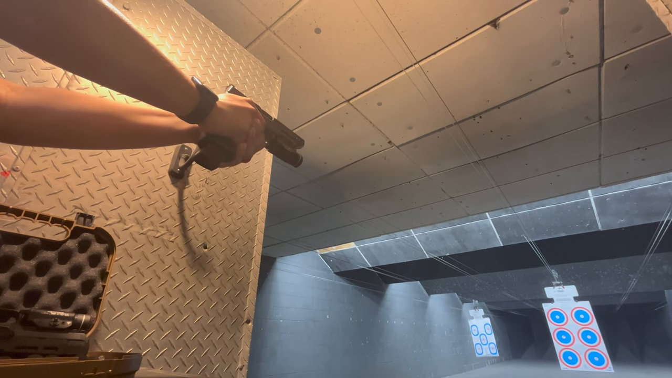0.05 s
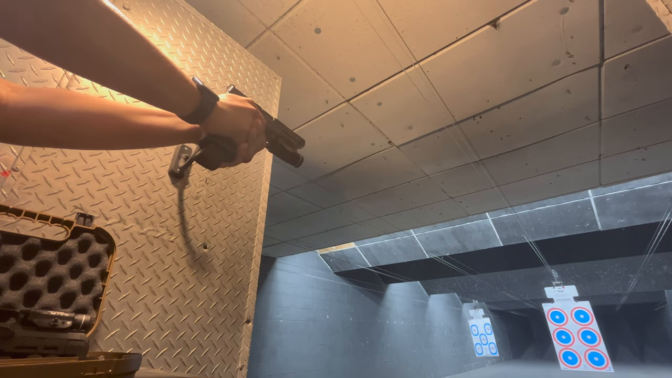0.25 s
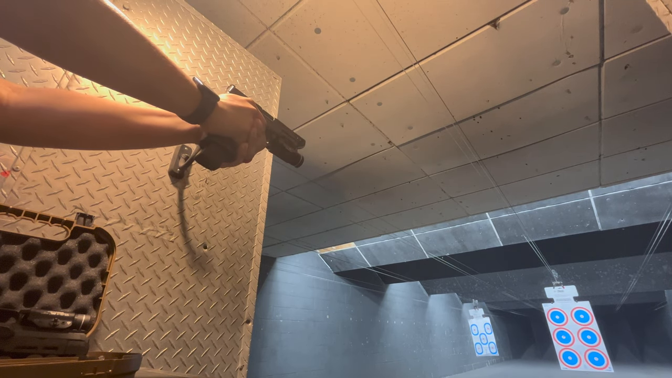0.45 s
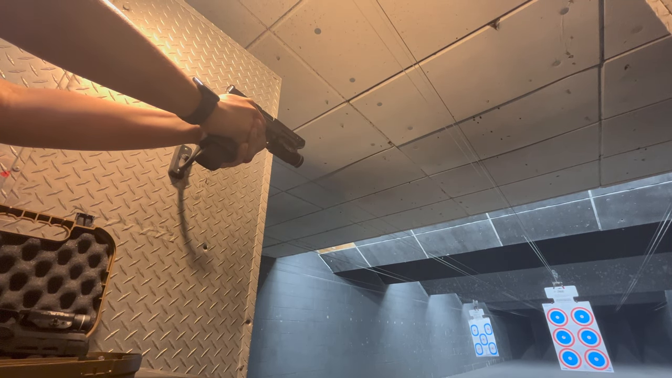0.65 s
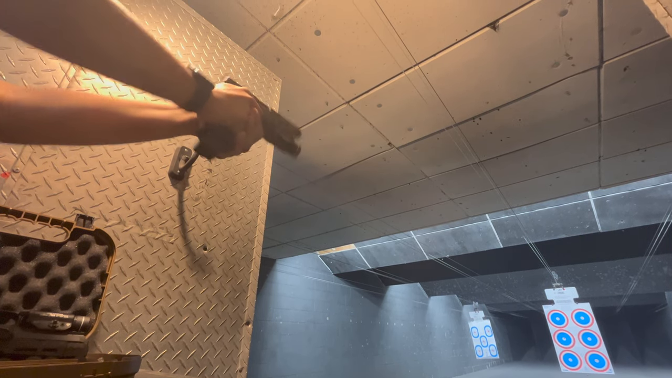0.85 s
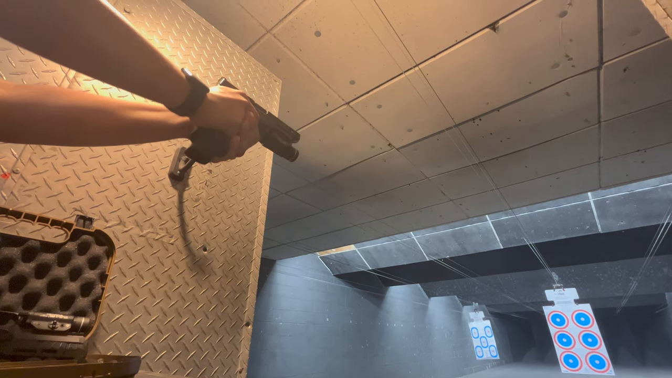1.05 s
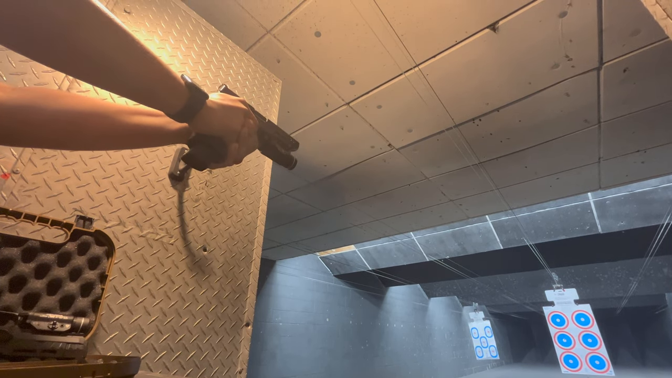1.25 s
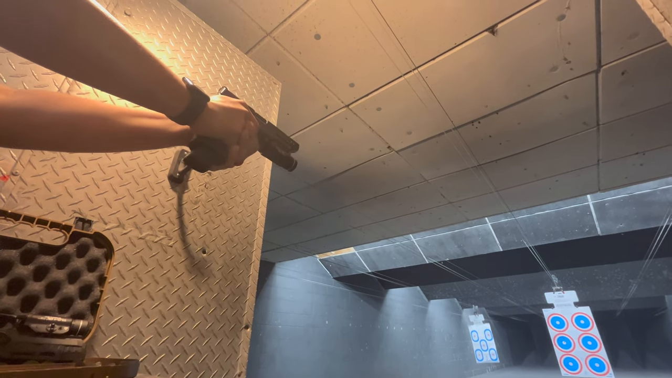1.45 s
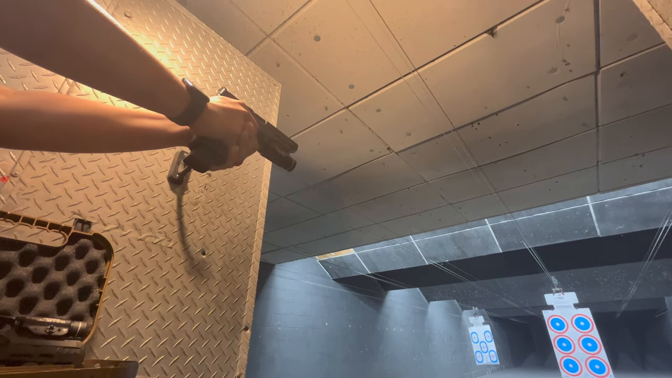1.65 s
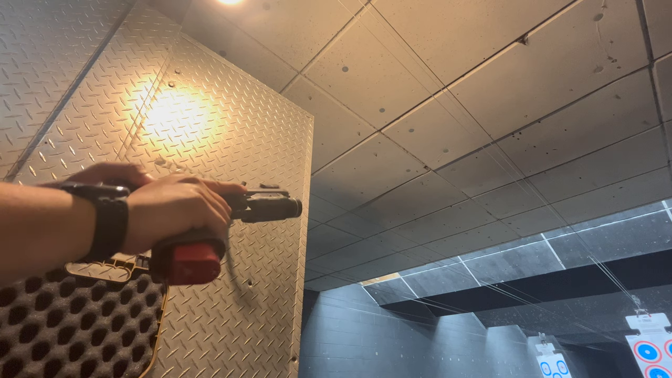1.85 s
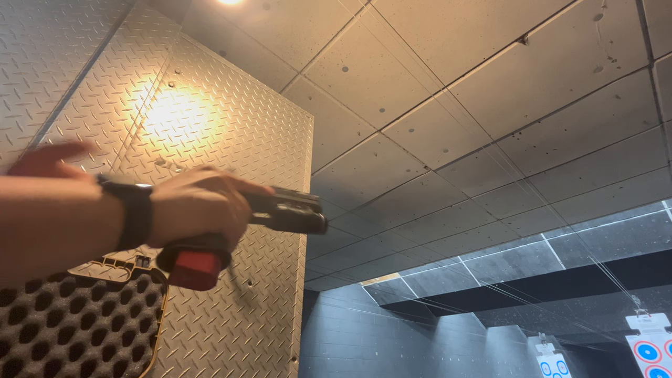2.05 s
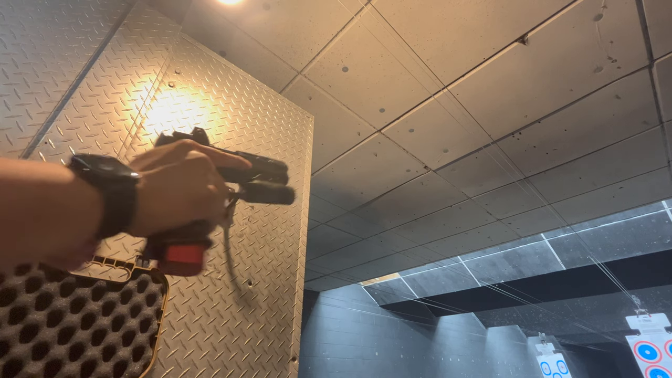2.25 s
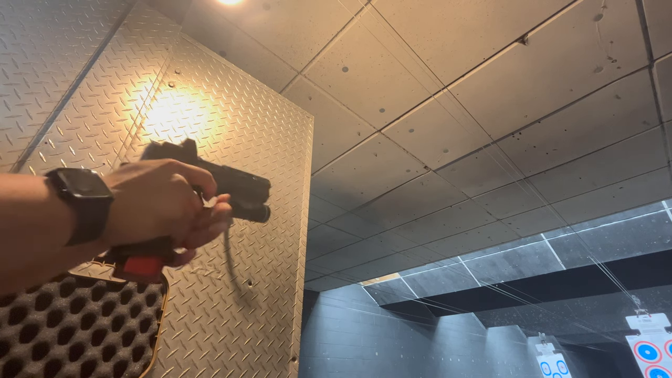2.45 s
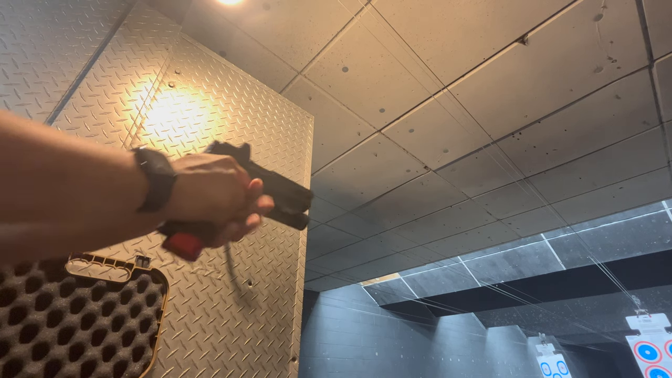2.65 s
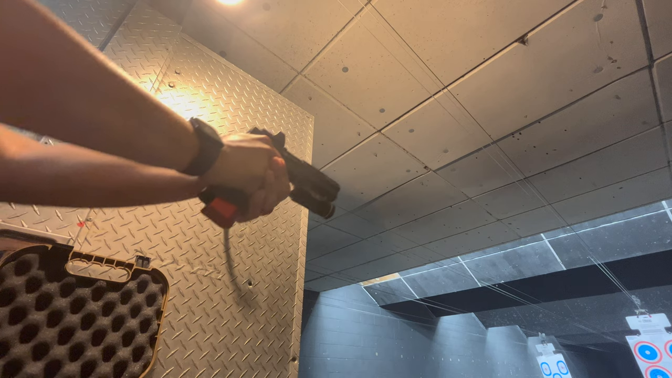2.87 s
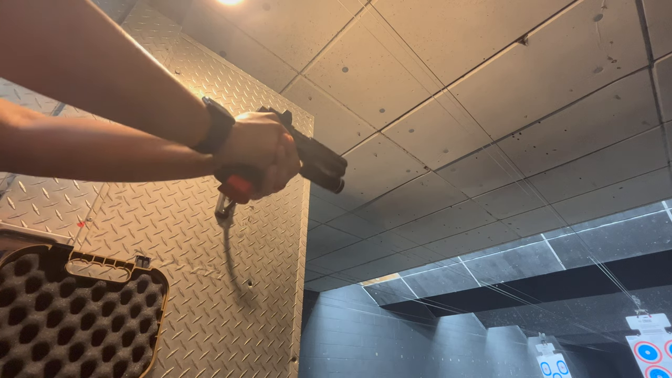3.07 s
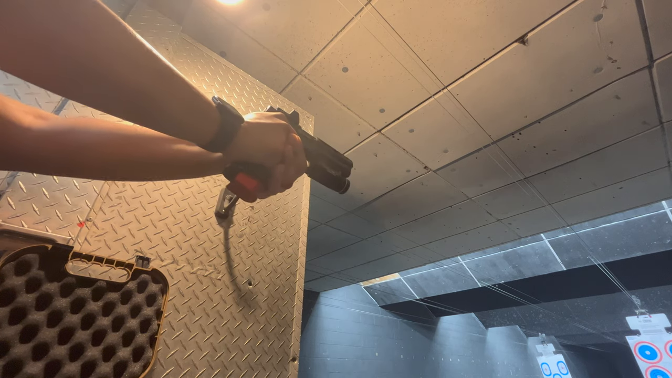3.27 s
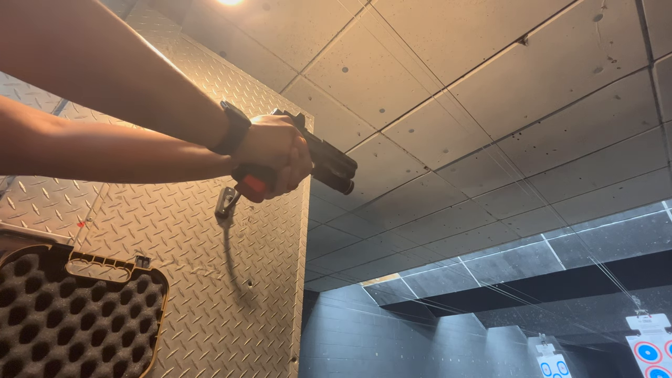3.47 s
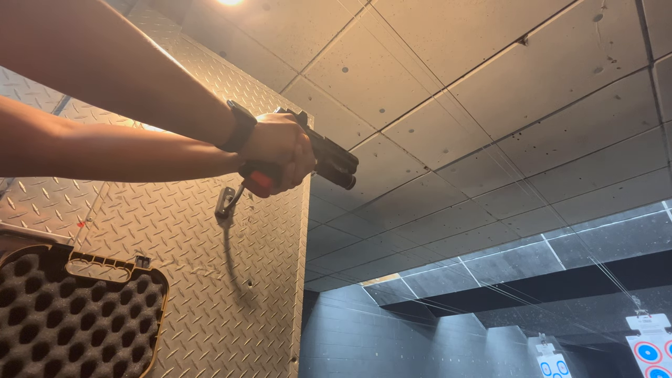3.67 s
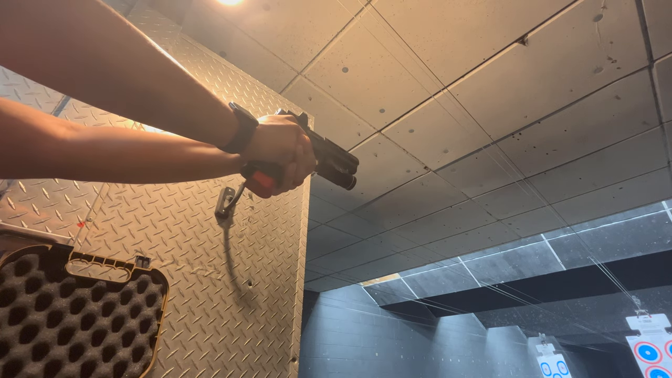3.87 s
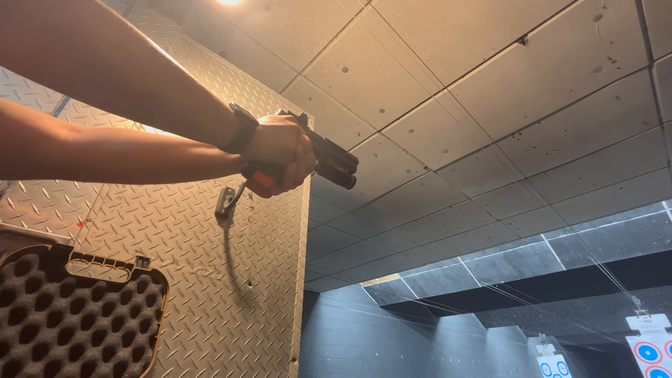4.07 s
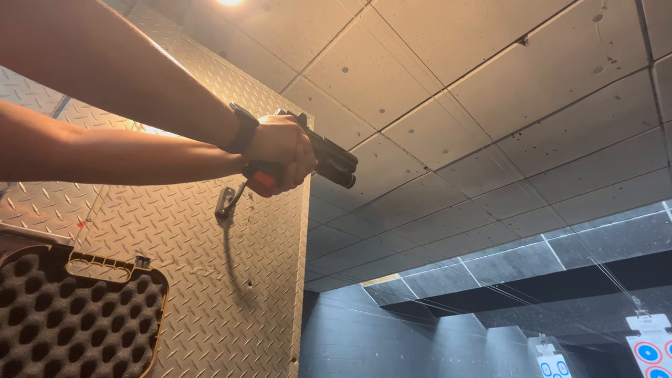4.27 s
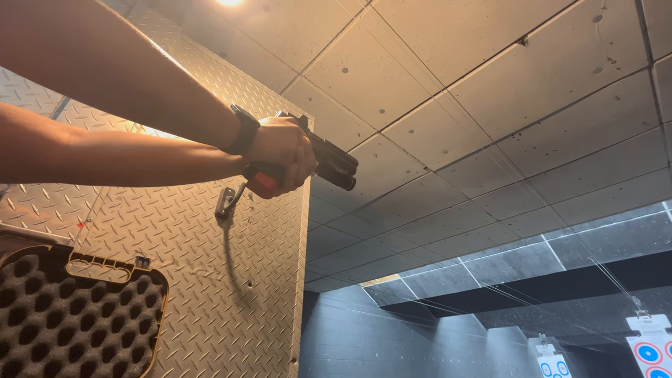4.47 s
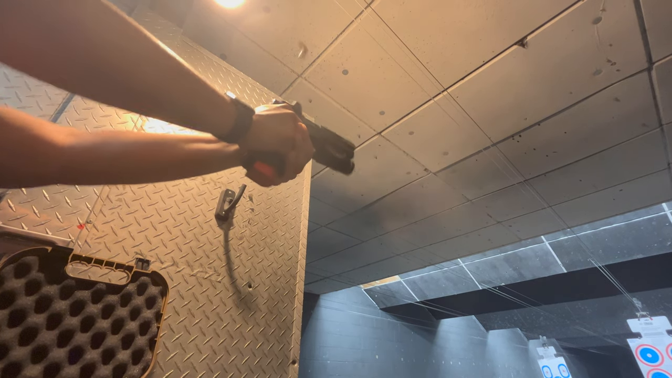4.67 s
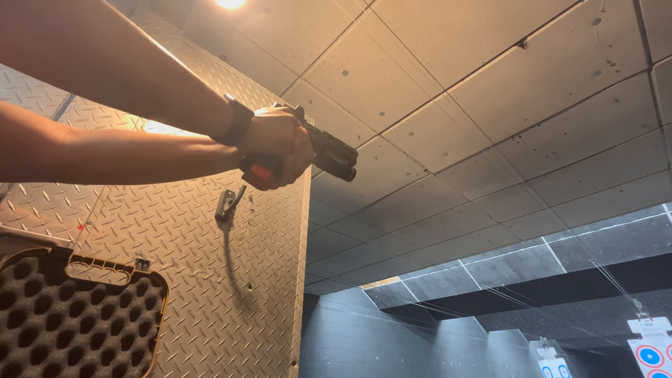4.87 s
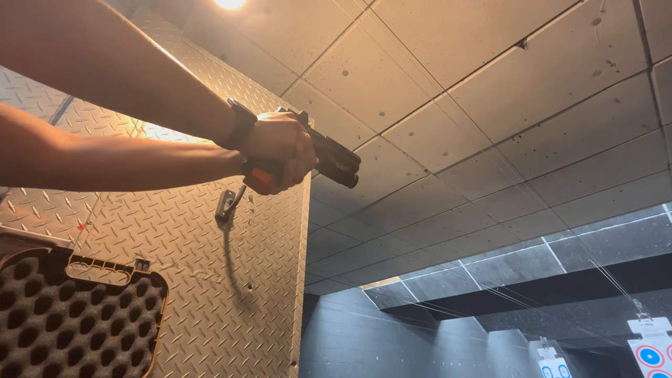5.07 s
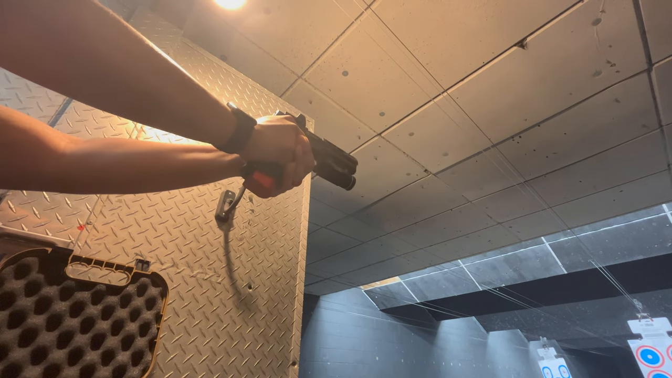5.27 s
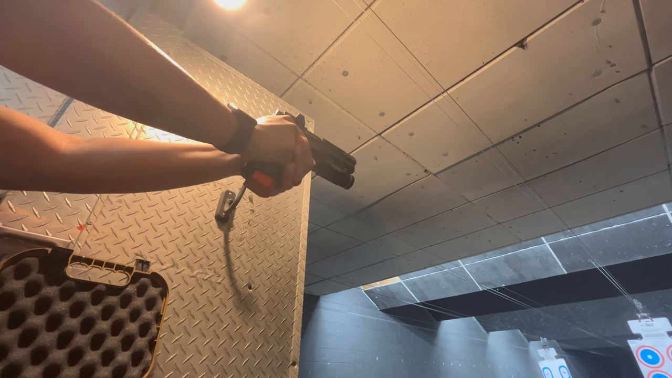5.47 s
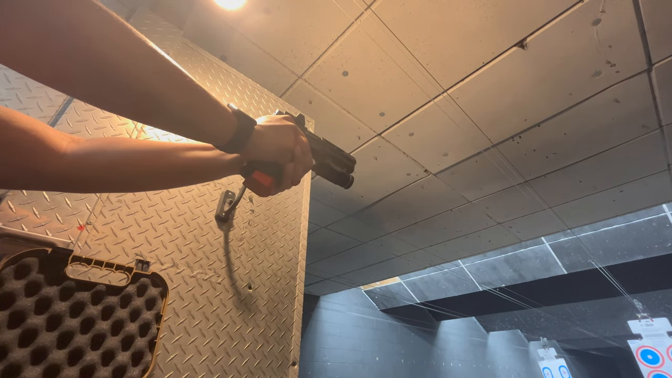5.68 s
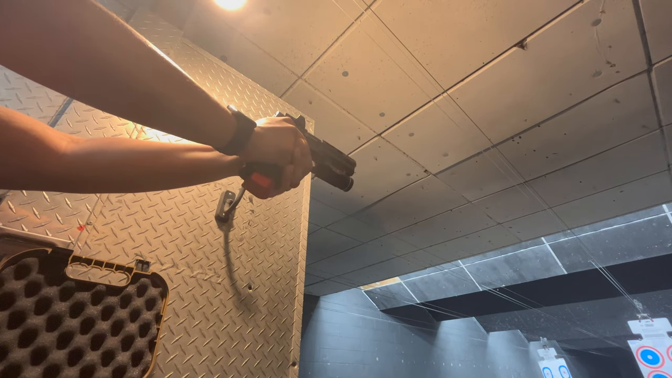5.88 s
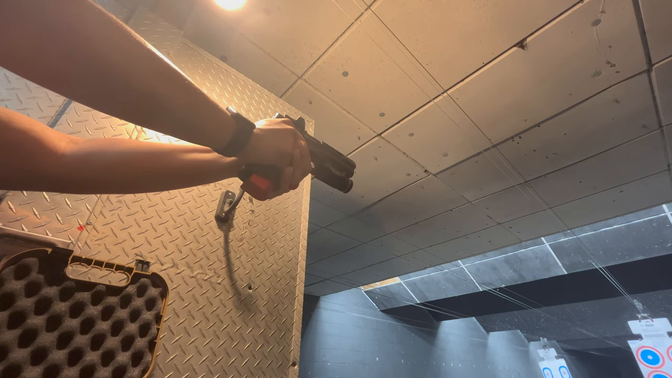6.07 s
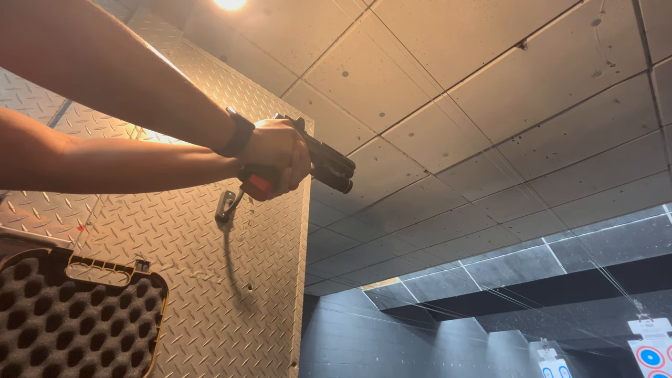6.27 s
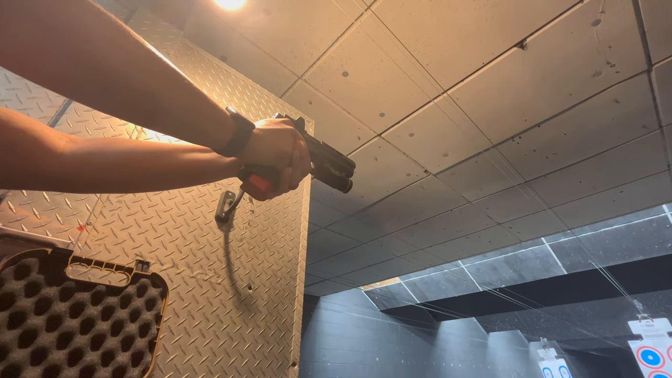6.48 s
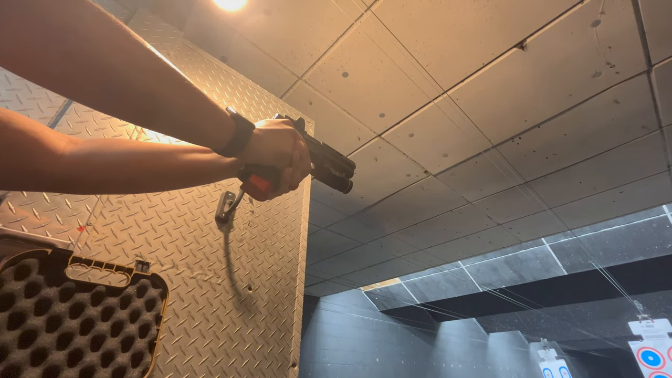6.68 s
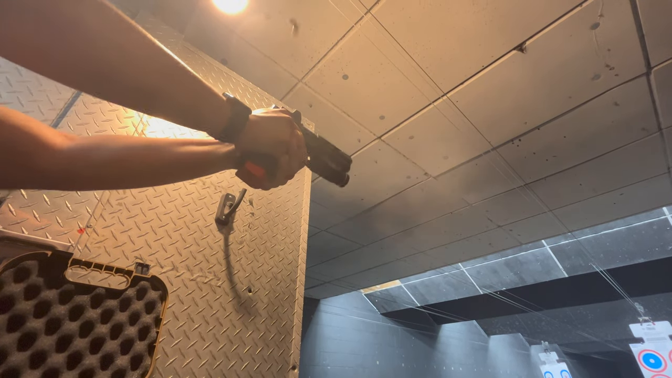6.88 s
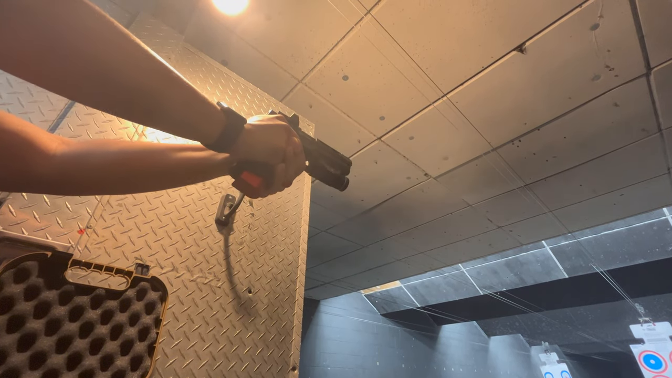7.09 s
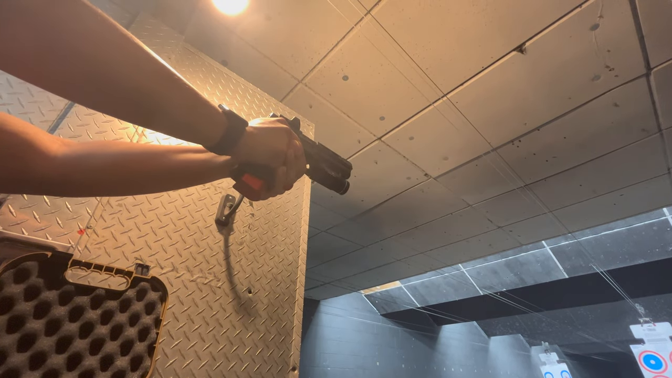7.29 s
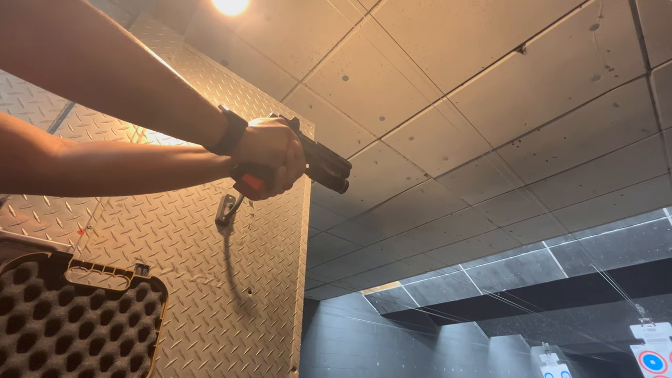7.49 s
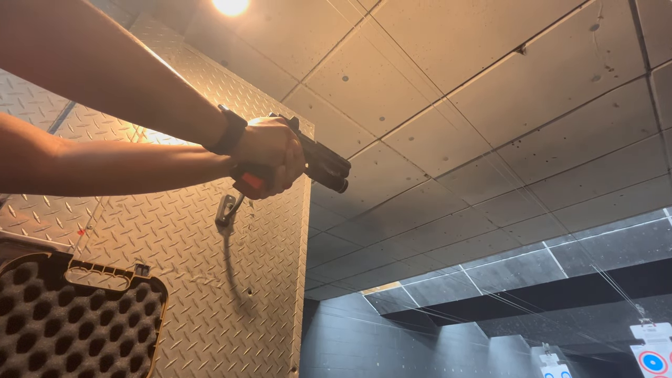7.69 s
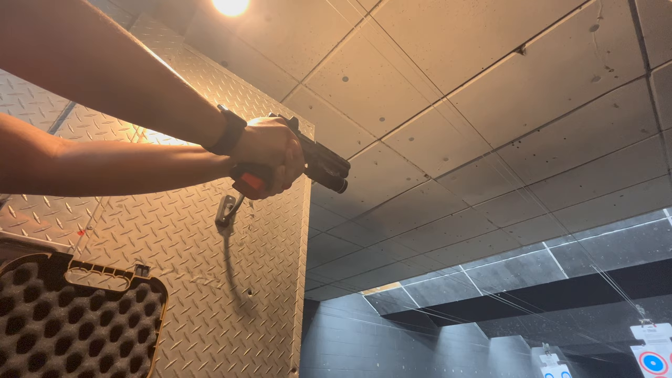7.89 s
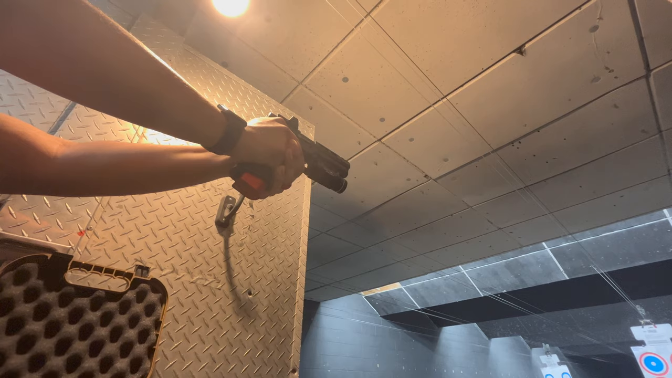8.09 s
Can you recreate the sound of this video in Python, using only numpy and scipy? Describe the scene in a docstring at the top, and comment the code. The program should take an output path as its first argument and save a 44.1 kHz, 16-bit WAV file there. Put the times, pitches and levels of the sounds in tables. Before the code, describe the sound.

One handgun shot, a brisk slide rack over rushing ventilation, then a faster run of near and neighbouring-lane shots ringing through a concrete hall.

```python
"""Handgun fire in a long concrete indoor range, heard from the bench. Order in time:
faint 1 kHz hall wash and faint ventilation noise (band noise, duct resonances, fan lines); brass cases (tick + tube
ring); near shots (the booth fills at once, the far end answers after about 0.14 s, the hall dies away); at 1.7 s the
slide is racked (clicks into frame resonances), and from there to 4.5 s the air noise is heard loud, with a brief dip
after the slide noises; then near shots mixed with shots from another lane, with more cases landing."""
import sys
import numpy as np
from scipy import signal
from scipy.io import wavfile

SR = 44100
rng = np.random.default_rng(int(sys.argv[2]) if len(sys.argv) > 2 else 0)


def unload_wav(signal):
    """Save mono or channel-first audio to the path in sys.argv[1] as 16-bit WAV at rate SR, clipped to [-1, 1]."""
    wavfile.write(
        sys.argv[1],
        SR,
        np.round(np.clip(np.atleast_2d(signal).T, -1, 1) * 32767).astype(np.int16),
    )


N = 358974


def amp(db):
    """dB to gain."""
    return 10 ** (np.asarray(db) / 20)


def rms_one(x):
    """Scale to rms 1."""
    return x / np.sqrt(np.mean(x ** 2) + 1e-20)


def at_hz(points, hz):
    """Read a table on a log-frequency axis."""
    table_hz, values = np.array(points).T
    return np.interp(np.log(hz), np.log(table_hz), values)


def in_time(rows, t):
    """Read a curve at times t."""
    return np.interp(t, *np.transpose(rows))


def add(out, sound, start_s):
    """Mix a sound in at start_s, cut at the end of out or at N."""
    i = round(start_s * SR)
    out[:, i:i + sound.shape[-1]] += sound[..., :N - i]


def resonance(x, hz, width_hz):
    """Two-pole peak with gain 1 on top."""
    r = np.exp(-np.pi * width_hz / SR)
    b = [(1 - r * r) / 2, 0, (r * r - 1) / 2]
    a = [1, -2 * r * np.cos(2 * np.pi * hz / SR), r * r]
    return signal.lfilter(b, a, x)


def steep_resonance(x, hz, width_hz):
    """Same peak twice in series: steeper skirts."""
    return resonance(resonance(x, hz, width_hz), hz, width_hz)


def drift(size, rate_hz):
    """Slow chance of spread 1, drawn at every 50th sample."""
    r = np.exp(-100 * np.pi * rate_hz / SR)
    slow = signal.lfilter([1], [1, -2 * r, r * r], rng.standard_normal(size // 50 + 402))[400:]
    return np.interp(np.arange(size) / 50, np.arange(len(slow)), rms_one(slow))


def ports(size):
    """White noise that is mostly shared by the two microphone ports."""
    mid, side = rng.standard_normal((2, size))
    return mid + .3 * side * [[1], [-1]]


BAND_EDGES_HZ = 22 * 2 ** np.arange(0, 9.7, .4)


def bands(size, likeness, balance):
    """Stereo noise band by band, with the likeness and balance of the two microphone ports."""
    white = rng.standard_normal((2, 2, size + 4000))
    for k, (low_hz, high_hz) in enumerate(zip(BAND_EDGES_HZ, BAND_EDGES_HZ[1:])):
        sos = signal.butter(2, [low_hz, high_hz], "band", fs=SR, output="sos")
        mid, side = signal.sosfilt(sos, white[k % 2])[:, 4000:]   # filter run-in dropped
        hz = np.sqrt(low_hz * high_hz)
        alike = np.clip(at_hz(likeness, hz), -1, 1)
        lean_db = at_hz(balance, hz) / 2
        pair = np.sqrt(1 + alike) * mid + np.sqrt(1 - alike) * side * [[1], [-1]]
        yield hz, pair * amp([[lean_db], [-lean_db]])


# Air noise between the ports: f/Hz, left-right likeness
AIR_LIKENESS = [(60, 1), (130, 0.99), (290, 0.34), (640, -0.86), (1410, -0.19), (3100, 0.16), (6820, 0.17),
                (15000, -0.49)]
# Air noise balance: f/Hz, L-R/dB
AIR_BALANCE = [(60, -1), (110, 1.5), (200, -2), (380, -1.5), (700, 5), (1290, 5.5), (2380, 2), (4400, 14.5),
               (8120, 2.5), (15000, -2.5)]


def steady(colour, level_db, tones, size):
    """Smooth air noise, with resonances standing out of it."""
    air = bands(size, AIR_LIKENESS, AIR_BALANCE)
    out = rms_one(sum(amp(at_hz(colour, hz)) * noise for hz, noise in air))
    for hz, width_hz, db in tones:
        out = out + amp(db) * rms_one(steep_resonance(ports(size), hz, width_hz))
    out = np.tile(out, N // size + 1)[:, :N]   # recurs only where it is faint
    return out * amp(level_db)


# Hall wash level: t/s, level/dB
WASH_LEVEL = [(0, -64.5), (.15, -68), (.73, -70), (1.7, -85), (1.72, -120)]
# Hall wash spectrum: f/Hz, density/(dB per Hz)
WASH_COLOUR = [(180, -15.5), (300, -8), (757, -5), (1130, 6.5), (1240, -6), (6370, -33), (10100, -28.5),
               (10900, -28), (12000, -34.5), (15600, -74.5), (22000, -120)]


def hall_wash():
    """Faint noise of the hall around 1 kHz, at the start only."""
    t = np.arange(N) / SR
    return steady(WASH_COLOUR, in_time(WASH_LEVEL, t), [], size=2 * SR)


# Air noise level over its loud stretch, dipping briefly after the slide noises: t/s, level/dB
LOUD_AIR = [(1.716, -37.5), (1.93, -38), (2.03, -47), (2.12, -38.5), (2.17, -34), (4.537, -32)]
QUIET_START_DB, QUIET_AFTER_DB, CREEP_DB_PER_S = -77.5, -90, 8.4   # before and after: faint, creeping up


def air_db(t):
    """Level at which the air noise is heard: faint, loud, faint."""
    on_s, off_s = LOUD_AIR[0][0], LOUD_AIR[-1][0]
    before_db = QUIET_START_DB + CREEP_DB_PER_S * t
    after_db = QUIET_AFTER_DB + CREEP_DB_PER_S * (t - off_s)
    quiet_db = np.where(t < on_s, before_db, after_db)
    return np.where((t >= on_s) & (t < off_s), in_time(LOUD_AIR, t), quiet_db)


# Ventilation spectrum: f/Hz, density/(dB per Hz)
AIR_COLOUR = [(12, -39), (20, -12.5), (60, -1.5), (142, -13), (204, -1), (248, -14.5), (310, -8.5),
              (590, -8), (1370, -12.5), (2390, -20.5), (2820, -25.5), (5850, -37), (10800, -53),
              (13500, -56), (16000, -85.5)]
# Duct resonances: f/Hz, width/Hz, level/(dB re air)
DUCT_TONES = [(48.3, 6, -12), (76.6, 17, -11.5), (122, 5.4, -17), (156.4, 6.6, -21.5), (200.2, 9, -15.5),
              (1360, 150, -19), (320.3, 17, -18)]


def ventilation():
    """Air noise of the ventilation with its duct resonances, at the heard air level."""
    t = np.arange(N) / SR
    return steady(AIR_COLOUR, air_db(t), DUCT_TONES, size=23 * SR // 5)


# Fan and motor lines: f/Hz, level/(dB re air)
FAN_LINES = [(119, -13.5), (159, -25.5), (199.2, -8.5)]


def fan_hum():
    """Fan and motor lines that waver in level and phase and follow the heard air level."""
    t = np.arange(N) / SR
    hum = 0
    for hz, db in FAN_LINES:
        level = amp(db + 2 * drift(N, 8))
        hum = hum + level * np.sin(2 * np.pi * (hz * t + 0.15 * drift(N, 3.2)))
    return hum * amp(air_db(t))


# Brass cases landing: t/s, tick level/dB, tick f/Hz, tick width/Hz, ring f/Hz, ring level/dB
CASES = [(.0444, -57, 5200, 1500, 10700, -110), (.5433, -64, 6000, 9000, 10900, -110),
         (1.1377, -23, 10100, 7000, 10200, -56), (1.3712, -18, 4000, 16000, 10150, -61),
         (5.0035, -28.5, 8300, 5000, 10600, -75), (5.008, -30, 7000, 8000, 10600, -62),
         (5.885, -54, 9940, 5000, 10700, -82), (7.196, -16.5, 6850, 3500, 10700, -80),
         (7.2005, -16, 6180, 2500, 10660, -79), (7.993, -51, 10100, 8000, 10400, -85)]
RATTLE_DB, CASE_T60_S = -17, .42   # after-rattle re tick; ring of the tube
THUMP_S, THUMP_DB = 1.374, -33.5   # one case hits close to the microphone


def cases():
    """A bright tick and the thin ring of the brass tube; one close hit adds a falling thump."""
    out, t = np.zeros((2, N)), np.arange(SR // 3) / SR
    for s, tick_db, tick_hz, width_hz, ring_hz, ring_db in CASES:
        decay = np.exp(-t / 0.002) + amp(RATTLE_DB) * np.exp(-t / 0.012)
        burst = rng.standard_normal((2, len(t))) * decay
        tick = resonance(resonance(burst, tick_hz, width_hz), tick_hz, 1.1 * width_hz)
        split_beat = 1 + .5 * np.cos(2 * np.pi * 45 * t)   # a split mode beats
        ring = np.sin(2 * np.pi * ring_hz * t) * split_beat * amp(-60 * t / CASE_T60_S)
        ring = ring + .7 * np.sin(2 * np.pi * 1.16 * ring_hz * t) * np.exp(-t / .015)
        ring = ring + .4 * np.sin(2 * np.pi * 1.29 * ring_hz * t) * np.exp(-t / .02)
        add(out, amp(tick_db) * tick + amp(ring_db) * ring, s)
    thump_cycles = 55 * t + 2.3 * (1 - np.exp(-t / 0.0061))   # falls to 55 Hz
    thump = np.sin(2 * np.pi * thump_cycles) * np.exp(-t / 0.042)
    add(out, amp(THUMP_DB) * thump, THUMP_S)
    return out


def arrivals_db(t, booth, answer):
    """Swells on top of the decay: the booth fills and drains, then the far end answers."""
    rise_s, drain_from_s, drain_s, booth_db = booth
    arrive_s, build_s, fade_s, answer_db = answer
    filled = np.clip(t / rise_s, 0, 1) * np.clip(1 - (t - drain_from_s) / drain_s, 0, 1)
    late_s = np.maximum(t - arrive_s, 0)
    answered = np.minimum(late_s / build_s, 1) * np.exp(-np.maximum(late_s - build_s, 0) / fade_s)
    return booth_db * filled + answer_db * answered


# Decay of the blast: f/Hz, T60/s
BLAST_T60 = [(40, 0.89), (300, 0.49), (1000, 0.52), (3000, 0.19), (9000, 0.39), (15000, 0.067)]
# Decay of the hall: f/Hz, T60/s
HALL_T60 = [(40, 0.97), (100, 1.15), (250, 1.21), (600, 1.46), (1000, 1.97), (2000, 1.76), (5000, 1.38),
            (9000, 0.74), (15000, 0.21)]
# Shot between the ports: f/Hz, left-right likeness
SHOT_LIKENESS = [(60, 0.9), (130, 1), (290, 0.48), (640, -0.59), (1410, -0.15), (3100, 0.1), (6820, 0.02),
                 (15000, 0.3)]
# Shot balance: f/Hz, L-R/dB
SHOT_BALANCE = [(60, 2.5), (110, 1.5), (200, 0.5), (380, -3), (700, 2.5), (1290, 2.5), (2380, 0),
                (4400, 10), (8120, -0.5), (15000, -4)]
BOOM_HZ, BOOM_T60_S = 95.3, 1.19
BOOM_BEAT_HZ, BOOM_BEAT_TOP_S = 7.7, 0.036
RING_HZ, RING_T60_S = 968, 2.17   # a narrow band of the hall outlasts the rest
CRACK_RISE_S, SLOW_BELOW_HZ = .0005, 450


def report(size, blast, hall, booth, answer, stretch, hall_db, echo_db, boom_db, beat, build_cycles):
    """One shot: bright blast in the booth, its return from the far end, slow hall decay, boom and ring."""
    fine = np.arange(size) / SR
    t = fine[::10]   # envelopes step every ten samples
    late_s = t - .136 * stretch
    clumps = drift(size, 70)[::10]   # separate reflections arrive in clumps
    out = 0
    for hz, noise in bands(size, SHOT_LIKENESS, SHOT_BALANCE):
        fast_db_per_s = -60 / at_hz(BLAST_T60, hz)
        direct = amp(fast_db_per_s * t) ** 2
        echo = (late_s > 0) * amp(echo_db + fast_db_per_s * np.abs(late_s)) ** 2
        early = amp(at_hz(blast, hz)) ** 2 * (direct + echo) * amp(1.2 * clumps) ** 2
        tail_db = at_hz(hall, hz) + hall_db + 0.27 * clumps - 60 * t / at_hz(HALL_T60, hz)
        power = early + amp(tail_db) ** 2
        rise_s = build_cycles / hz * (hz < SLOW_BELOW_HZ) + CRACK_RISE_S   # lows build up later
        build = 1 - np.exp(-t / rise_s)
        patches = amp(1.42 * drift(len(t), 220) * (hz < 2500))   # bands below swell and sink separately
        out = out + noise * np.repeat(np.sqrt(power) * build * patches, 10)
    out = out / np.sqrt(np.mean(out[:, :SR // 10] ** 2))
    boom = np.sin(2 * np.pi * BOOM_HZ * fine + [[.5], [-.4]])
    boom = boom * amp(boom_db - 60 * fine / BOOM_T60_S) * (1 - np.exp(-fine / 0.033))
    # a close neighbour mode beats with the boom
    boom = boom * (1 + beat * np.cos(2 * np.pi * BOOM_BEAT_HZ * (fine - BOOM_BEAT_TOP_S)))
    ring = rms_one(steep_resonance(rng.standard_normal((2, size)), RING_HZ, 70))
    ring = ring * amp(boom_db - 9 - 60 * fine / RING_T60_S) * (1 - np.exp(-fine / 0.032))
    return (out + ring + boom) * amp(arrivals_db(fine / stretch, booth, answer))


# Near shots: t/s, level/dB, stretch of the arrival times, dip just after the crack/dB
NEAR_SHOTS = [(0.734, -12.5, 1.02, -2), (4.5344, -11, 1.09, -18), (6.7245, -12, 1.02, -4),
              (8.088, -12.5, 1.1, -6)]
# Other lane: t/s, level/dB, extra level of the first 32 ms/dB
FAR_SHOTS = [(5.2732, -20, 4.5), (6.4403, -18.5, -1.6), (7.4538, -19, 1)]
# Near blast spectrum: f/Hz, density/(dB per Hz)
NEAR_BLAST = [(18, -43.5), (30, -19), (233, -21), (415, -4), (486, -5), (740, -12.5), (866, 1), (1630, -7),
              (2060, -12.5), (4910, -11.5), (13300, -26.5), (14800, -25), (16000, -103)]
# Hall spectrum after a near shot: f/Hz, density/(dB per Hz)
NEAR_HALL = [(18, -35.5), (30, -12), (90, -5.5), (124, -9), (295, -3.5), (426, -5.5), (486, 1),
             (1130, -7.5), (2480, -13.5), (5170, -21), (13000, -31.5), (14800, -56.5), (16000, -94)]
# Other-lane blast spectrum: f/Hz, density/(dB per Hz)
FAR_BLAST = [(18, -36), (30, -40), (86, 2), (174, -25), (239, -2), (569, -0.5), (913, 3), (1100, -7),
             (1540, 1), (2680, -16.5), (6550, -14.5), (14000, -32), (16000, -77)]
# Hall spectrum after an other-lane shot: f/Hz, density/(dB per Hz)
FAR_HALL = [(18, -54), (30, -46), (86, -8), (124, -9.5), (230, -5.5), (449, -8), (499, -1.5), (649, -5),
            (1010, -6), (1190, -8.5), (1910, -10), (8980, -25.5), (13700, -29), (16000, -78)]
# Booth fills, holds, drains: rise/s, drain start/s, drain/s, swell/dB (times before stretch)
NEAR_BOOTH, FAR_BOOTH = (.06, 0.08, .03, 3.3), (0.039, 0.073, 0.082, 5.35)
# Far end answers: arrival after the shot/s, rise/s, fade/s, swell/dB (times before stretch)
NEAR_RETURN, FAR_RETURN = (.131, .011, 0.084, 3.5), (0.13, 0.059, 0.14, 5.25)


def shots():
    """The hand-held near gun shifts between shots; the other lane sets off the same response each time."""
    out, t = np.zeros((2, N)), np.arange(3 * SR // 2) / SR
    for s, db, stretch, dip_db in NEAR_SHOTS:
        size = len(t) if s * SR + len(t) < 1.05 * N else SR // 10   # short if the end cuts it
        dip = amp(dip_db * (t > .008) * np.exp(-t / 0.014))
        near = report(size, NEAR_BLAST, NEAR_HALL, NEAR_BOOTH, NEAR_RETURN, stretch,
                      hall_db=0.14, echo_db=-14.5, boom_db=-11, beat=.2, build_cycles=2.5)
        add(out, amp(db) * dip[:size] * near, s)
    far = report(len(t), FAR_BLAST, FAR_HALL, FAR_BOOTH, FAR_RETURN, stretch=0.91,
                 hall_db=0.0, echo_db=-18.5, boom_db=-14.0, beat=0.65, build_cycles=0.52)
    for s, db, first_db in FAR_SHOTS:
        add(out, amp(db + first_db * (t < .032)) * far, s)
    return out


def modes(envelope, noise, table):
    """Broad steep resonances, each fed by its own stretch of the noise."""
    out = 0
    for k, (hz, width_hz, db) in enumerate(table):
        drive = envelope * np.roll(noise, 999 * k, axis=1) + 1e-18
        gain = amp(db) * np.sqrt(2 * SR / np.pi / width_hz)   # evens out the width
        out = out + gain * steep_resonance(drive, hz, width_hz)
    return out


# Slide and magazine contacts: t/s, level/dB, brightness/dB, hold/s, T60/s
CONTACTS = [(1.7176, -30, 1.5, .002, 0.21), (1.732, -28, -4.5, 0.0017, .035),
            (1.76, -15.5, 5.5, .008, .025), (1.7719, -14, -4.5, 0.0044, 0.022),
            (1.782, -25, -4.5, 0.0022, 0.1), (1.829, -31.5, 3, .001, .027), (1.881, -35.5, 3, .001, .06),
            (1.929, -27.5, 1, .002, .063), (1.939, -16.5, 0.5, 0.0033, 0.14),
            (1.949, -15, 6.5, 0.013, 0.04), (1.9696, -11.5, 1, 0.00081, 0.012),
            (1.975, -20, -3, 0.0018, .089), (2.583, -47.5, -3, .002, .15), (2.63, -52, 6, .001, .04),
            (3.132, -53, 2, .001, .05)]
# Frame resonances, one list each for knock, scrape, tick: f/Hz, width/Hz, level/dB
SLIDE_MODES = [
    [(1373, 310, -0.5), (875, 480, -6.5)],
    [(4760, 4100, -1.5), (2180, 1000, -8.5), (3200, 400, -15), (7940, 4000, -7)],
    [(12700, 12000, -0.5)],
]
# Slide sound lingering in the hall: f/Hz, width/Hz, level/dB
LINGER_MODES = [(2500, 700, -1.5), (3860, 3500, -0.5), (8400, 5000, -16.5)]
SLIDE_START_S = 1.7
KNOCK_DB, TICK_DB = -5.5, -4   # re level; brightness takes from the knock and gives to the tick
LINGER_DB, LINGER_UNTIL_S, LINGER_T60_S = -5, 2.24, 0.81   # re air level
SLIDE_PORTS = [(-.3, 2.3), (.1, 3.5), (.5, -1)]   # knock, scrape, tick: likeness, L lean = -R lean/dB


def slide():
    """Steel on steel: dense uneven clicks under each contact ring the frame's broad resonances."""
    size, t = 2 * SR, np.arange(SR // 4) / SR
    grit = rms_one(rng.standard_normal((2, size)) * amp(1.7 * rng.exponential(1, size)))
    now = SLIDE_START_S + np.arange(size) / SR
    linger_db = air_db(now) + LINGER_DB - 60 * np.maximum(now - LINGER_UNTIL_S, 0) / LINGER_T60_S
    part = modes(amp(linger_db), grit[:, ::-1], LINGER_MODES)
    for k, (table, (alike, lean_db)) in enumerate(zip(SLIDE_MODES, SLIDE_PORTS)):
        power = np.zeros((1, size))
        for s, db, bright_db, hold_s, t60_s in CONTACTS:
            db = db + [KNOCK_DB - bright_db, 0, TICK_DB + bright_db][k]
            contact = amp(db - 60 * np.maximum(t - hold_s, 0) / t60_s) ** 2
            booth_tail = amp(db - 22.5 - 60 * t / 0.5) ** 2
            add(power, contact + booth_tail, s - SLIDE_START_S)
        pair = np.array([grit[0], alike * grit[0] + np.sqrt(1 - alike ** 2) * grit[1]])
        part = part + modes(np.sqrt(power), pair, table) * amp([[lean_db], [-lean_db]])
    out = np.zeros((2, N))
    add(out, part, SLIDE_START_S)
    return out


def scene():
    """All sources at the microphone."""
    return hall_wash() + ventilation() + fan_hum() + cases() + shots() + slide()


# Microphone peaks and dips: f/Hz, width/Hz, level/dB
MIC_COLOUR = [(510, 120, -1), (949, 270, 2), (1380, 280, 1.5), (2070, 140, -1), (2700, 270, 0),
              (2830, 180, -1.5), (4700, 220, 0.5)]
MIC_TOP_HZ, CUTOFF_HZ = 14900, 16650


def record(dry):
    """Small microphone colour, rounded peaks, falling top, steep cut."""
    for hz, width_hz, db in MIC_COLOUR:
        dry = dry + (amp(db) - 1) * resonance(dry, hz, width_hz)
    rounded = 0.87 * np.tanh(dry / 0.99)
    soft_top = signal.sosfilt(signal.butter(8, MIC_TOP_HZ, fs=SR, output="sos"), rounded)
    return signal.sosfilt(signal.cheby2(12, 70, CUTOFF_HZ, fs=SR, output="sos"), soft_top)


dry = scene()
out = record(dry)
unload_wav(out)
```